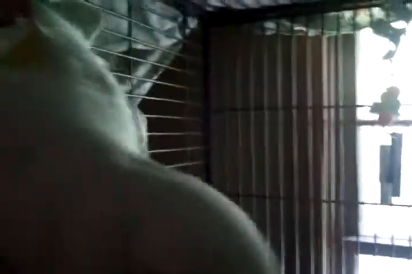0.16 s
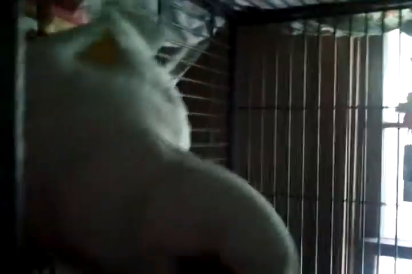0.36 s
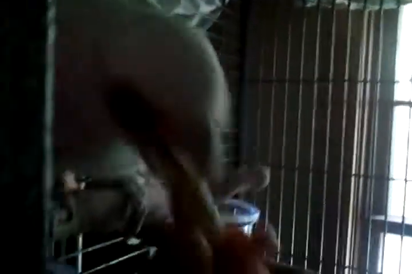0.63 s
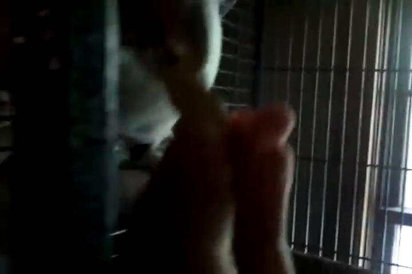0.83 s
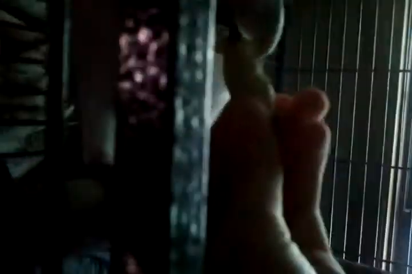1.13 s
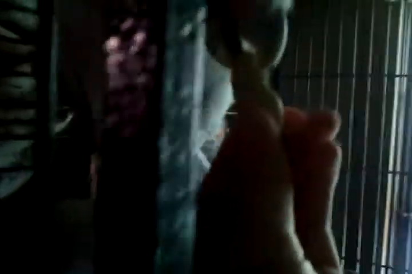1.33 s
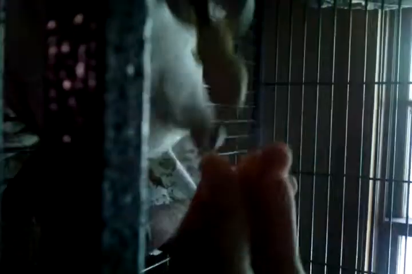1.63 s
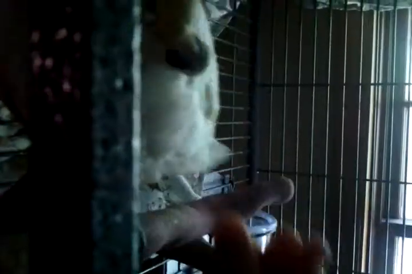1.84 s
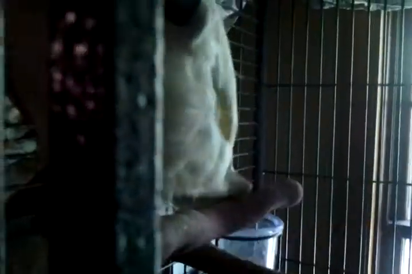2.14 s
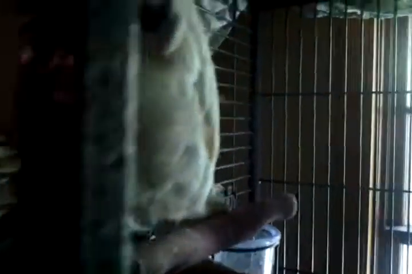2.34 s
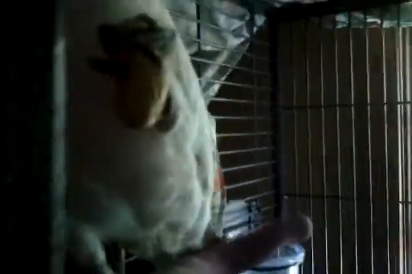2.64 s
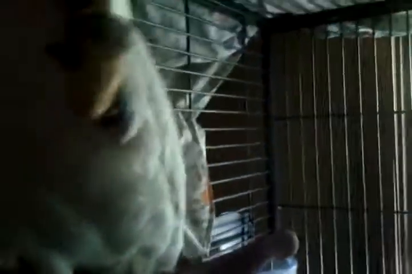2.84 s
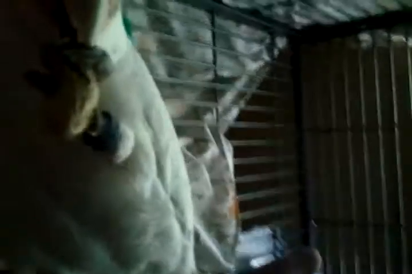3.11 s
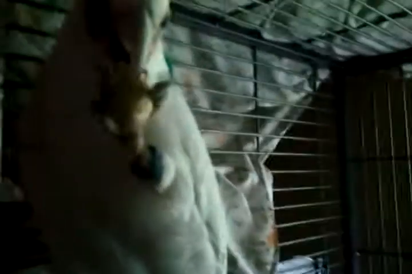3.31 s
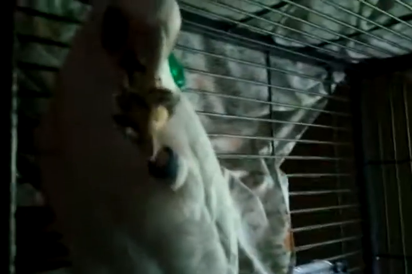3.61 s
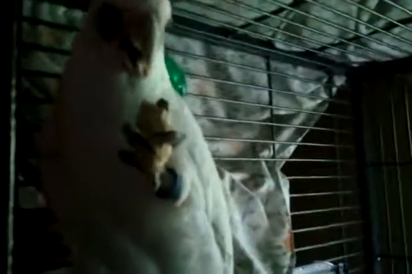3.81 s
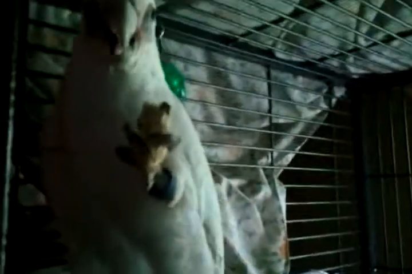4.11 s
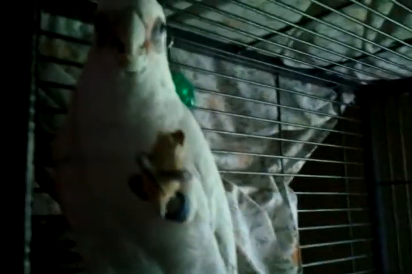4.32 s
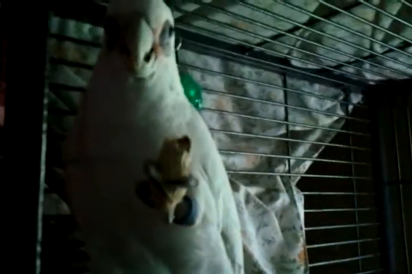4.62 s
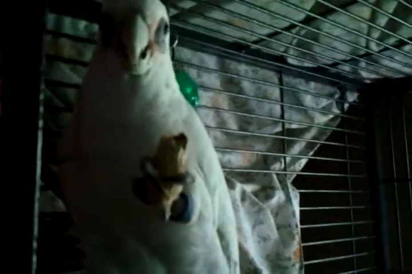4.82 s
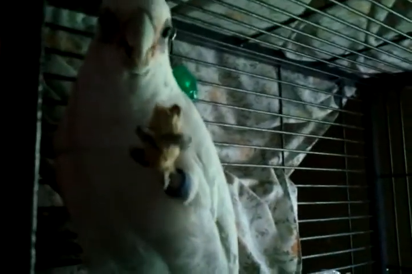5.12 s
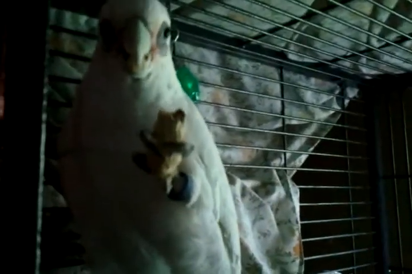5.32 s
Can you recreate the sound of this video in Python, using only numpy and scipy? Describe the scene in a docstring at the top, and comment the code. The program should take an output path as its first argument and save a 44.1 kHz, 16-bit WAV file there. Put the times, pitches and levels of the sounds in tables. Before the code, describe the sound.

Crisp clicks and crunches of a parrot biting food in a wire cage, followed by faint peeps over soft hiss.

```python
"""Cockatoo cracking a treat

A cockatoo in a wire cage, a hand's width from the microphone, bites a dry treat and shifts its claws.
Each snap is a millisecond burst of tiny fractures; the cage and a small room answer, and the hardest
snaps overload the microphone. The treat crumbles under hard bites, faint ticks and rustling feathers
fill the pauses, and a thin squeak and a few faint peeps follow, over hiss and a low hum."""
import sys
import numpy as np
from scipy import signal
from scipy.fft import rfft, irfft
from scipy.io import wavfile

SR = 44100
rng = np.random.default_rng(int(sys.argv[2]) if len(sys.argv) > 2 else 0)


def wav_record(signal):
    """Record a signal, one row per channel, as 16-bit PCM in the file named by sys.argv[1]."""
    frames = np.transpose(np.atleast_2d(signal))
    bounded = np.clip(frames, -1, 1)
    # unit amplitude maps onto the largest positive 16-bit level
    quanta = np.round(bounded * 32767).astype(np.int16)
    wavfile.write(sys.argv[1], SR, quanta)


N = 240609
TIME = np.arange(N) / SR

# Snaps of beak and claws; body and room send are relative to the bright edge:
# (time [s], edge level as rms over 1 ms [dB], ring [Hz], burst length [ms], body [dB], room send [dB])
SNAP_HITS = [(.1699, -17.5, 6200, 1.6, -23.5, -6), (.2651, -10, 5400, 1.6, -29.5, -7),
             (.3057, -22, 5100, 0.55, -24, -7), (.3493, -21, 5000, 0.77, -24, -13),
             (.4115, -25, 5600, 2.5, -20, -1), (.5742, -19, 3900, 0.21, -16, -13.5),
             (.6098, -14.5, 5160, 2.3, -25.5, -7.5), (.6553, -21.5, 4700, 1.6, -22, -3),
             (.6617, -19.5, 5240, 2.6, -25.5, -8.5), (.7148, -25.5, 5600, .6, -33, -13),
             (.7702, -16.5, 5900, .1, -25, -14), (.7798, -13.5, 5600, 0.19, -25, -27),
             (.8026, -11, 5650, 0.34, -19, -14), (.8262, -19.5, 6400, 0.33, -14.5, -2),
             (.8338, -9, 6100, 0.28, -23, -6), (.8368, 3.5, 6660, 1.41, -30, -25),
             (.8402, -2.5, 4900, 0.88, -31, -10.5), (.9163, -9.5, 5300, 0.16, -23, -15.5),
             (.9356, -24.5, 5500, .4, -18, -16), (1.0753, -30.5, 5600, 1.2, -18, 0),
             (1.12, -21.5, 5900, .2, -13, -2), (1.1274, -1.5, 6140, 0.78, -19, -3.5),
             (1.1337, 2.5, 5900, 1.06, -14, -12), (1.1428, -7, 6000, 0.47, -24, -16),
             (1.1635, 9, 5040, 1.85, -14, -19), (1.1686, -8.5, 5800, 2, -23, -9),
             (1.187, 8, 5740, 1.0, -15, -10), (1.193, -5, 5650, 1.2, -28, -20),
             (1.207, -19.5, 5070, 1.7, -14.5, 5), (1.3167, -27, 5250, 1.9, -16, -1),
             (1.3617, -18.5, 5770, 0.31, -27, -10), (1.4049, -29, 5960, 0.37, -19, -4),
             (1.4449, -20.5, 5900, 0.19, -20, -21), (1.4972, -25, 5570, 0.32, -27, -1),
             (1.5266, -24.5, 5370, .3, -28, -5), (1.729, -26.5, 5550, 0.35, -25, -7),
             (1.7469, -28.5, 5900, 0.18, -30, -18), (1.8216, -2, 5600, 0.17, -25, -16.5),
             (1.95, -15.5, 6530, 0.11, -20.5, -10.5), (2.057, -27, 5570, 1.6, -21, 1),
             (2.114, -23.5, 5540, 1.9, -14.5, -10), (2.181, -29, 5560, 0.55, -10, 1),
             (2.189, -25.5, 6200, 0.7, -15, -15), (2.2025, -10.5, 6800, 0.21, -14.5, -8.5),
             (2.2166, -12.5, 6260, 0.28, -10, -3.5), (2.2446, 11, 5930, 0.87, -26.5, -19),
             (2.2737, -11, 6460, 0.62, -18, -7), (2.2921, 5.5, 6700, 0.86, -27, -27),
             (2.319, -15, 6600, 0.18, -13, -12), (2.3303, 7.5, 5700, 1.1, -19, -21),
             (2.339, -16, 5500, 0.7, -8, -8), (2.375, -26, 5650, 2, -14, -12),
             (2.3816, 2.5, 5270, 0.82, -20, -12.5), (2.3891, -2.5, 7300, .9, -19, -17),
             (2.3945, -7.5, 5770, 1.05, -12, -4.5), (2.4018, -3, 7250, 1.35, -21, -23),
             (2.4117, -14, 5800, 1.3, -26, -14), (2.8771, -33, 5760, .7, -14.5, 3.5),
             (2.9537, -3.5, 6300, 0.35, -9.5, -18.5), (2.9567, -8.5, 5800, 0.59, -14.5, -7),
             (2.9681, -20, 5800, 0.34, -20, -16), (2.985, -16.5, 6500, 0.55, -13.5, -25),
             (2.998, -21.5, 5400, 0.16, -15, -11), (3.0805, -26, 5930, 1, -21, -3),
             (3.1, -22.5, 4870, 0.8, -10.5, -1), (3.1064, -2.5, 5600, 0.56, -14, -10),
             (3.4159, -36, 5500, .4, -7.5, 2), (3.4675, -27, 6300, 0.22, -14.5, -5),
             (3.4857, -14, 5630, 1.4, -12, -9.5), (3.492, -18.5, 5300, 2, -7.5, -12),
             (3.5105, -21, 6900, 0.16, -11, -8), (3.516, -23, 5940, 1.1, -20, -16),
             (3.617, -15.5, 5400, 0.19, -16, -9.5), (3.7131, -35, 5400, 0.95, -15, 2),
             (3.7754, -28.5, 5370, 0.85, -15, -5), (4.6502, -21, 4870, 2.2, -12, -6.5)]
# EQ of a snap's bright edge: (frequency [Hz], gain [dB])
EDGE_EQ = [(1500, -49.5), (3200, -25.5), (4200, -9), (5000, -1), (5600, 0.5), (6300, -3), (7200, -6),
           (8200, -5), (12000, -12.5)]
# EQ of its hollow body: (frequency [Hz], gain [dB])
BODY_EQ = [(30, -5), (150, 7), (450, 9), (850, 4.5), (1400, -1), (2200, -0.5), (2900, -3), (3600, -0.5),
           (4400, 5.5), (7000, -22.5)]
# Two hollow resonances, retuned a little at every bite: (centre [Hz], width [Hz], gain [dB])
HOLLOW_MODES = [(2190, 580, -3), (2795, 600, 3)]


def snaps(hits, ring_width_hz=2000, splinter_db=-13, splinter_ms=3.3, splinters_per_s=1500, detune=.05):
    """Short runs of fractures excite a bright ring and a hollow body; returns direct sound and send."""
    direct, send = np.zeros(N), np.zeros(N)
    ms = np.arange(SR // 25) * 1000 / SR
    one_ms_gain = np.sqrt(SR / 1000)
    noises = rng.standard_normal((len(hits), len(ms)))
    breaks = rng.random((len(hits), len(ms))) < splinters_per_s / SR
    tunings = np.exp(detune * rng.standard_normal(len(hits)))
    for hit, noise, broken, tuning in zip(hits, noises, breaks, tunings):
        start, db, ring_hz, length_ms, body_db, send_db = hit
        # the shell gives way at once, then a few splinters follow
        crack = unit(noise * np.exp(-(ms / length_ms) ** 4))
        splinters = unit(broken * np.sign(noise) * np.exp(-ms / splinter_ms))
        burst = crack + undb(splinter_db) * splinters
        edge = unit(colour(resonate(burst, ring_hz, ring_width_hz), EDGE_EQ))
        # the sudden release also knocks the body as one blow
        blow = burst + signal.unit_impulse(len(ms))
        hollow = sum(undb(gain) * resonate(blow, tuning * hz, width) for hz, width, gain in HOLLOW_MODES)
        body = undb(body_db) * unit(colour(hollow, BODY_EQ))
        snap = (edge + body) * undb(db) * one_ms_gain
        add(direct, start, snap)
        add(send, start, snap * undb(send_db))
    return direct, send


# The beak bears down on the treat: (time [s], length [s], level [dB])
HARD_BITES = [(1.126, 0.12, -27), (1.48, 0.058, -43), (2.206, .2, -30), (3.472, 0.042, -43.5)]
# EQ of the crumbling: (frequency [Hz], gain [dB])
CRUNCH_EQ = [(100, -26), (700, -15), (1500, -16.5), (3200, -14.5), (4400, -4.5), (5500, 2.5), (6500, -4.5),
             (8000, -18), (12000, -15)]


def crunches():
    """A crackle of tiny fractures swells and dies with each hard bite."""
    crackle = colour(grains(per_s=900, spread_db=4, max_db=12), CRUNCH_EQ)
    out = np.zeros(N)
    for start, length, db in HARD_BITES:
        bite = crackle[int(start * SR):int((start + length) * SR)]
        add(out, start, level(bite * signal.windows.tukey(len(bite), alpha=.48), db))
    return out


# Spells of nibbling: (start [s], end [s])
NIBBLE_SPELLS = [(0, 2.2), (2.85, 3.8)]


def ticks(per_s=9, db=-36, spread_db=1.5, ring_hz=5700, length_ms=1.24, body_db=-17, send_db=-.5):
    """The nibbling beak makes faint snaps at random moments; returns rows like SNAP_HITS."""
    draws = rng.random((120, 4))
    times = np.cumsum(.3 + 1.4 * draws[:, 0]) / per_s
    variations = 2 * draws[:, 1:] - 1
    return [(s, db + spread_db * loud, ring_hz * (1 + .08 * high), length_ms * (1 + long / 2),
             body_db, send_db)
            for s, (loud, high, long) in zip(times, variations)
            if any(start < s < end for start, end in NIBBLE_SPELLS)]


def squeak(length_s=.091, start_hz=4300, sag_hz_per_s=2430, drop_hz=450, attack_s=.0062, release_s=.02):
    """One thin, fading note that sags steadily, then drops away as it ends."""
    t = np.arange(int(length_s * SR)) / SR
    hz = start_hz - sag_hz_per_s * t - drop_hz * (t / length_s) ** 5
    gate = np.clip(np.minimum(t / attack_s, (length_s - t) / release_s), 0, 1)
    return whistle(hz) * gate * undb(-25 - 91 * t)  # fades 91 dB a second


# Faint peeps: (time [s], length [s], pitch [Hz], glide [Hz], peak level [dB])
PEEP_NOTES = [(4.134, 0.053, 3710, -44, -52.5), (4.443, 0.081, 6110, -38, -54.5),
              (4.953, 0.052, 4420, 40, -42), (4.96, 0.053, 6100, -18, -49.5),
              (5.114, 0.067, 6290, 25, -52.5)]


def squeak_and_peeps(squeak_at_s=4.437, echo_s=.0254, echo_db=-9):
    """The falling squeak beats against its echoes between two walls; soft peeps sound around it."""
    note, out = squeak(), np.zeros(N)
    for bounce in range(4):
        add(out, squeak_at_s + bounce * echo_s, undb(bounce * echo_db) * note)
    for start, length, hz, glide_hz, db in PEEP_NOTES:
        count = int(length * SR)
        peep = whistle(hz + glide_hz * np.linspace(0, 1, count))
        add(out, start, undb(db) * signal.windows.hann(count) * peep)
    return out


# Fader curve of claws and feathers rubbing: (time [s], relative level [dB])
MOVEMENT = [(0, -45), (.26, -47.5), (.48, -51), (.8, -45.5), (1.1, -49.5), (1.35, -47.5), (1.75, -54),
            (1.94, -48), (2.6, -47.5), (2.8, -52), (3.1, -49.5), (3.5, -53), (4.5, -54.5), (5.1, -51),
            (5.46, -53.5)]
# EQ of the rubbing: (frequency [Hz], gain [dB])
RUSTLE_EQ = [(200, -33.5), (1500, -12.5), (3200, -17), (4400, -5.5), (5500, 1.5), (6500, -8.5), (8000, -18),
             (12000, -17)]
# Soft brushes as the bird shifts its weight: (time [s], length [s], level at the crest [dB])
FEATHER_BRUSHES = [(2.468, 0.17, -58), (5.14, 0.28, -51)]
# EQ of a brush: (frequency [Hz], gain [dB])
BRUSH_EQ = [(60, -31), (280, -8), (750, 3), (1200, -9), (1650, -6), (2400, -13), (3300, -1), (4100, 5),
            (5300, 0), (7500, -18)]


def rustle(still_db=-56):
    """Claws and feathers rub in dense, tiny slips as the bird moves, with two soft brushes on top."""
    slips = colour(grains(per_s=2500, spread_db=3, max_db=12), RUSTLE_EQ)
    movement = undb(np.interp(TIME, *np.transpose(MOVEMENT)))
    above_stillness = np.sqrt(np.maximum(movement ** 2 - undb(still_db) ** 2, 0))
    out = level(slips, db=-1) * above_stillness
    for start, length, db in FEATHER_BRUSHES:
        count = int(length * SR)
        brush = level(colour(rng.standard_normal(count), BRUSH_EQ), db)
        add(out, start, signal.windows.hann(count) * brush)
    return out


# Cage wires that ring on after a snap: (pitch [Hz], relative level [dB], 60 dB decay time [s])
WIRE_MODES = [(4770, 3.5, .3), (5055, -8, .35), (5400, -6.5, 1), (5450, 2, .4), (5900, 1.5, 0.36),
              (6400, -11, .35), (6380, -15, .3), (6700, -2.5, 0.44)]


def cage_and_room(cage_db=-4, room_db=-2, wires_db=-31):
    """Impulse response of the space: scattered early echoes in the cage, a short tail, ringing wires."""
    t = np.arange(SR // 2) / SR
    onset = np.clip(t / .0012 - .5, 0, 1)
    cage = rng.standard_normal(len(t)) ** 3 * fade(t, t60=.052) * onset  # cubing makes spiky echoes
    room = rng.standard_normal(len(t)) * fade(t, t60=.22) * onset
    wires = sum(undb(db) * np.sin(2 * np.pi * hz * t) * fade(t, t60) for hz, db, t60 in WIRE_MODES)
    return undb(cage_db) * unit(cage) + undb(room_db) * unit(room) + undb(wires_db) * unit(wires)


# EQ of the steady hiss: (frequency [Hz], gain [dB])
HISS_EQ = [(25, -13.5), (55, -8.5), (120, -2.5), (300, -3), (600, -6.5), (1200, -9), (2400, -10.5),
           (3400, -9.5), (4400, -5), (5400, -3.5), (6400, -12), (8000, -13), (12000, -25)]
# Partials of the motor hum: (frequency [Hz], rms level [dB])
HUM_PARTIALS = [(59, -72), (172.3, -70.5), (258.4, -80), (349.9, -77.5)]


def room_tone(hiss_db=-55.5):
    """A bed of even hiss and the low hum of a motor in the house."""
    hum = sum(level(np.sin(2 * np.pi * (hz * TIME + rng.random())), db) for hz, db in HUM_PARTIALS)
    return level(colour(rng.standard_normal(N), HISS_EQ), hiss_db) + hum


def undb(db):
    """Decibels to amplitude."""
    return 10 ** (np.asarray(db) / 20)


def unit(x):
    """Scale to an energy of one."""
    return x / np.sqrt(np.sum(x ** 2))


def level(x, db):
    """Scale to an rms level."""
    return unit(x) * np.sqrt(len(x)) * undb(db)


def add(track, s, x):
    """Mix x into the track from time s."""
    start = max(int(s * SR), 0)
    track[start:start + len(x)] += x[:max(N - start, 0)]


def colour(x, eq, size=2048):
    """Minimum-phase EQ through (Hz, dB) points, built from the cepstrum."""
    hz, db = np.transpose(eq)
    curve_db = np.interp(np.log(np.fft.rfftfreq(size, 1 / SR) + 1), np.log(hz), db)
    cepstrum = irfft(np.log(undb(curve_db)))
    cepstrum[1:size // 2] *= 2
    cepstrum[size // 2 + 1:] = 0
    return signal.fftconvolve(x, irfft(np.exp(rfft(cepstrum))))[:len(x)]


def resonate(x, hz, width_hz):
    """One resonance with gain 1 at its centre."""
    return signal.lfilter(*signal.iirpeak(hz, hz / width_hz, fs=SR), x)


def fade(t, t60):
    """Decay that falls 60 dB in t60 seconds."""
    return np.exp(-np.log(1000) * t / t60)


def grains(per_s, spread_db, max_db):
    """Randomly timed clicks of uneven size."""
    clicks = (rng.random(N) < per_s / SR) * rng.choice([-1, 1], N)
    return clicks * undb(np.minimum(spread_db * rng.exponential(size=N), max_db))


def whistle(hz):
    """A pure tone that follows a pitch curve."""
    return np.sin(2 * np.pi * np.cumsum(hz) / SR)


def soft_clip(x, ceiling):
    """Clipping with a short, round knee."""
    return x / (1 + (x / ceiling) ** 20) ** (1 / 20)


def scene(send_db=-6):
    """Mono mix: snaps, crunches and calls with their echoes, over rustle and room tone."""
    space = cage_and_room()
    bed = rustle() + room_tone()
    crackle, calls = crunches(), squeak_and_peeps()
    direct, snap_send = snaps(SNAP_HITS + ticks())
    echoes = signal.fftconvolve(snap_send + undb(send_db) * (crackle + calls), space)[:N]
    return (direct + crackle + calls + echoes + bed)[None]


def record(dry, lopsided=.045, mic_edge_hz=8000, top_hz=16500):
    """The hardest snaps overload the microphone lopsidedly, which adds a low thump."""
    overloaded = soft_clip(dry, ceiling=.66 * (1 + lopsided * np.sign(dry)))
    narrow = signal.sosfiltfilt(signal.butter(10, mic_edge_hz, fs=SR, output="sos"), overloaded)
    # the filter's overshoots clip again and splash above its cutoff
    splashed = soft_clip(narrow, ceiling=.75)
    return signal.sosfilt(signal.ellip(8, .2, 70, top_hz, fs=SR, output="sos"), splashed)


dry = scene()
out = record(dry)
wav_record(out)
```